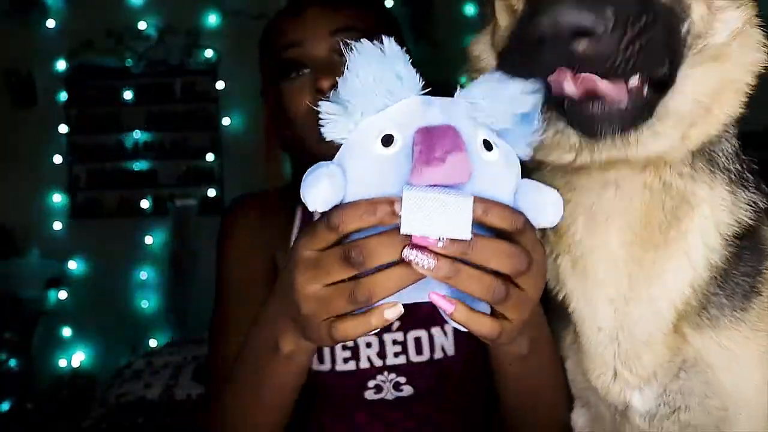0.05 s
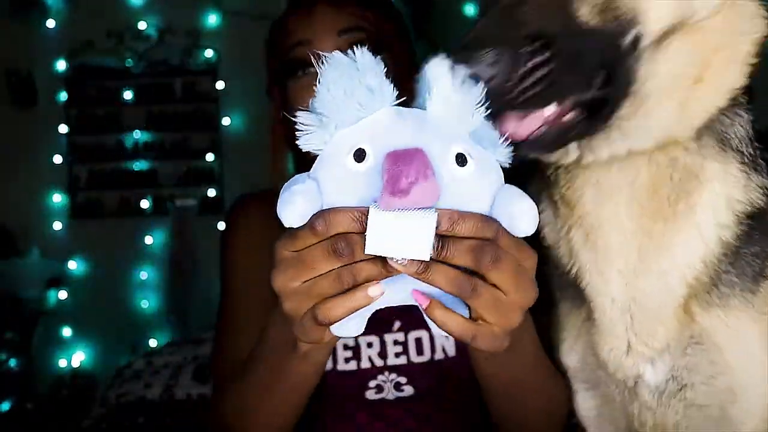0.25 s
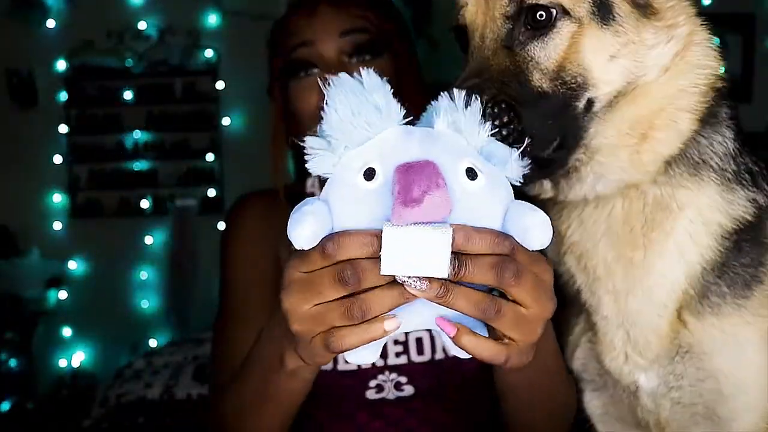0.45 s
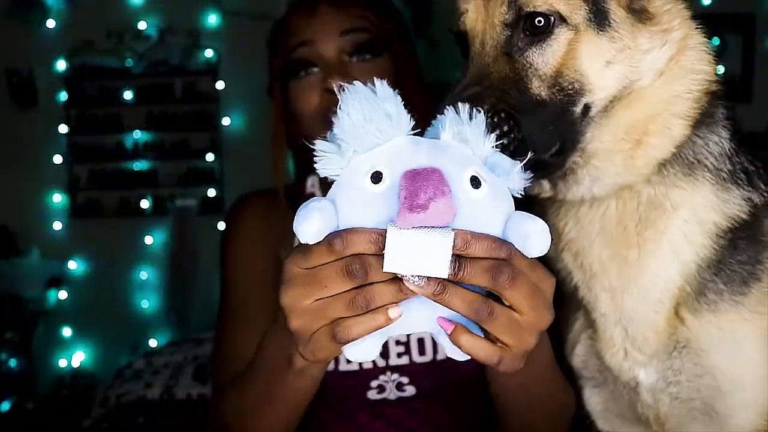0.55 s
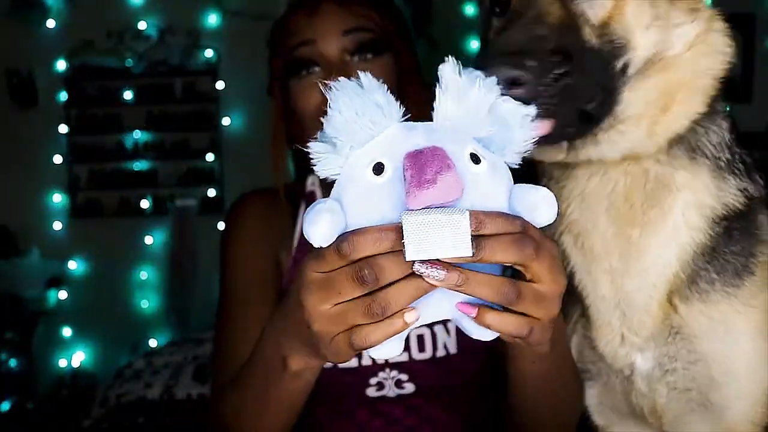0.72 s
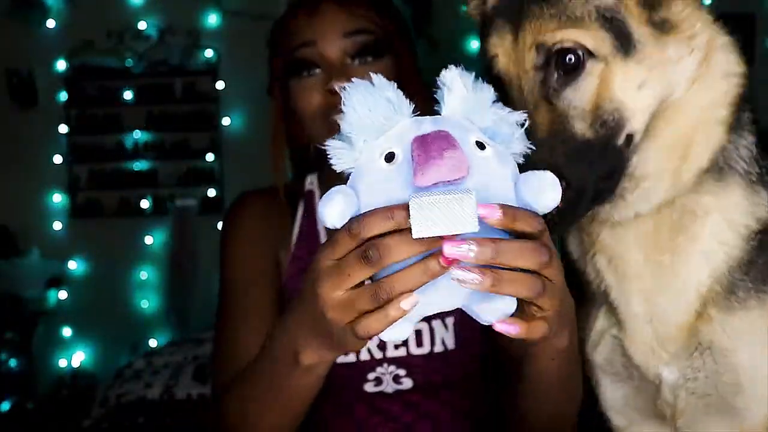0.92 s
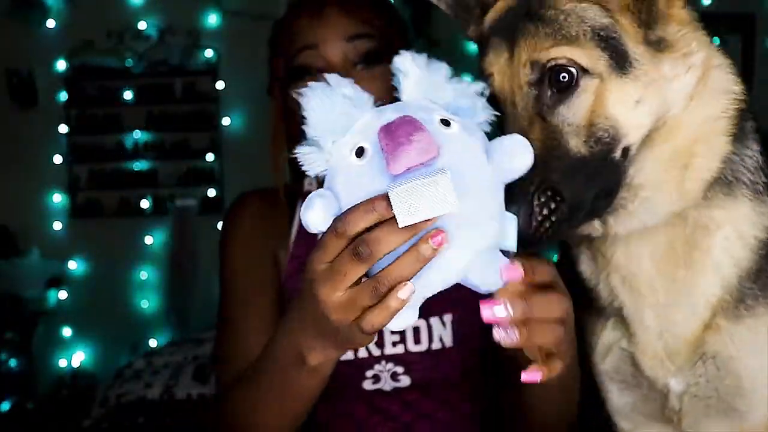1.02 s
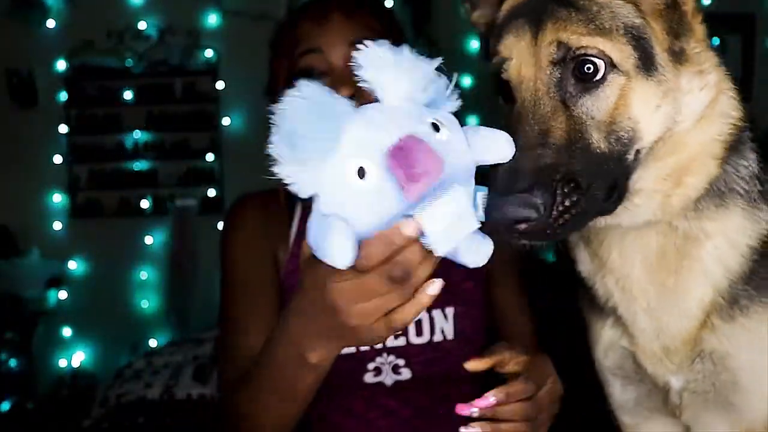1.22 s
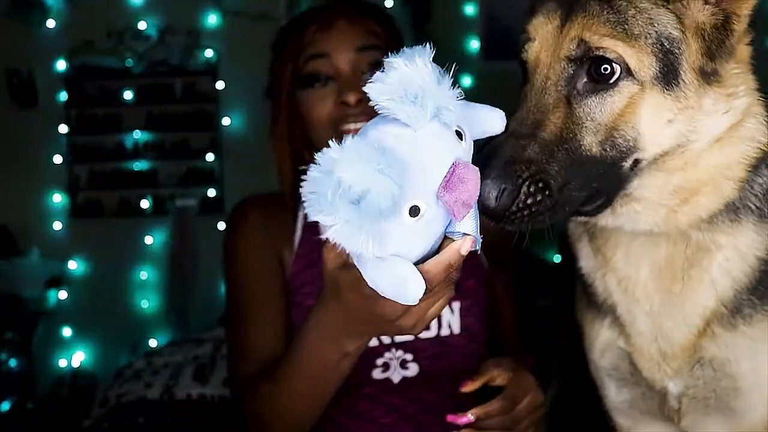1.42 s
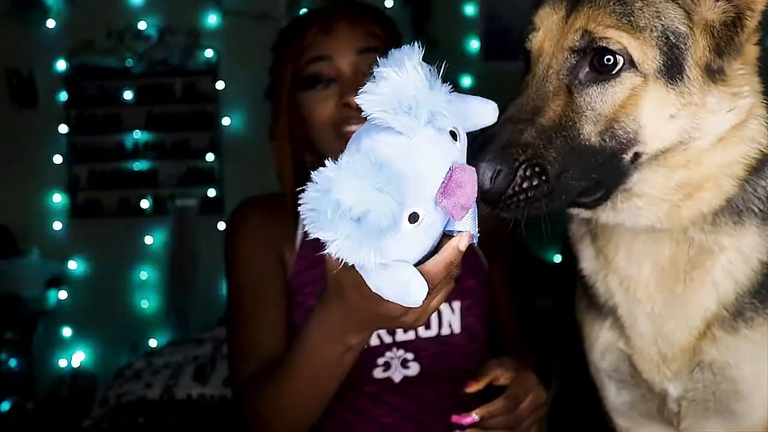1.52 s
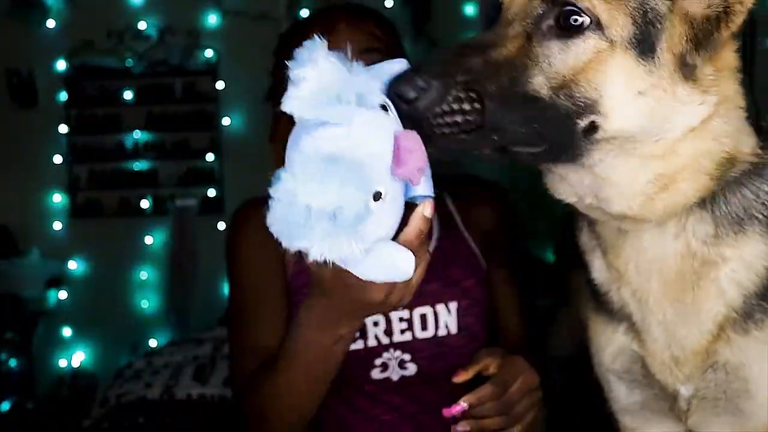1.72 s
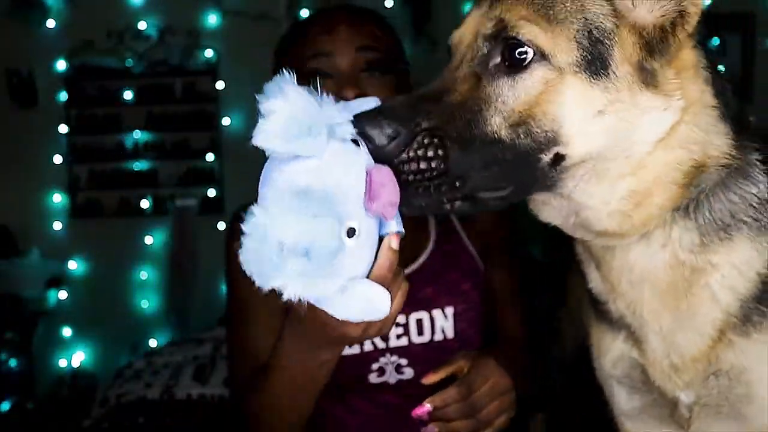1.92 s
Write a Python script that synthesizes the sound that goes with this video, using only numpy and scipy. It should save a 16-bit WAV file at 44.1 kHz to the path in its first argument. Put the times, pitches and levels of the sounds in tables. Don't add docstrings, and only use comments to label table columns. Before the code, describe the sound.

Crinkle film inside a soft toy crackles, then its reed squeaks out and back, twice, the second pair longer; rubbing, light snaps and a soft hollow pop follow, close to the microphone in a furnished room.

```python
import sys
import numpy as np
from scipy import signal
from scipy.fft import rfft, irfft, next_fast_len
from scipy.io import wavfile
from scipy.ndimage import uniform_filter1d, map_coordinates

SR = 44100
rng = np.random.default_rng(int(sys.argv[2]) if len(sys.argv) > 2 else 0)


def dump_mix(stems):
    frames = np.atleast_2d(stems).T
    limited = np.clip(frames, -1, 1)
    pcm = np.round(limited * 32767).astype(np.int16)
    wavfile.write(sys.argv[1], SR, pcm)


def voltage_ratio(decibels):
    exponent = np.asarray(decibels, float) / 20
    return 10 ** exponent


N = 85995

# time in seconds, effort in dB.
EFFORT = [(0, -59.5), (0.15, -49.5), (0.161, -36.5), (.21, -30.5), (0.289, -33), (.33, -40.5), (.78, -41),
          (.86, -39), (.97, -47.5), (1.0, -55.5), (1.06, -46.5), (1.09, -55), (1.16, -52.5), (1.22, -40.5),
          (1.275, -50.5), (1.31, -39.5), (1.37, -56.5), (1.66, -47.5), (1.8, -54.5)]
# time in seconds, fold peak in dB, crease peak in dB, note in Hz.
FIRST_SNAPS = [(0.0194, -33, -32.5, 3040), (0.0397, -26, -29.5, 3000), (0.0527, -31, -38, 3450),
               (0.0571, -25, -19.5, 6530), (0.063, -44, -34, 6460), (0.0754, -29, -30, 2930),
               (0.1026, -44, -31, 6420), (0.1223, -34, -31, 6680), (0.13, -24, -27, 3060),
               (0.1474, -37, -32, 2840), (0.159, -19, -27, 2890), (0.1694, -31, -30, 6270),
               (0.1759, -19, -35, 2930), (0.1825, -22, -24, 2450), (0.1966, -29, -22, 3060),
               (0.2018, -18, -16, 2800), (0.2051, -24, -28, 2670), (0.213, -18, -21, 2950),
               (0.2216, -20, -29, 2970), (0.228, -18, -23, 3010), (0.233, -19, -31, 3360),
               (0.2384, -30, -19.5, 4130), (0.2487, -28, -20, 7450), (0.2538, -27, -30, 2800),
               (0.257, -19, -23, 3100), (0.2613, -30, -29, 2800), (0.27, -10.5, -19, 2710),
               (0.2744, -18, -21, 2670), (0.2902, -30, -15.5, 6720), (0.3683, -33, -35, 6070),
               (0.3774, -20, -35, 4050), (0.3836, -29, -33, 1020), (0.397, -23, -19, 2800),
               (0.5017, -29, -21, 6720), (0.5206, -24, -23.5, 2910), (0.5367, -29, -22, 6850),
               (0.808, -25, -24, 2670), (0.824, -19, -27, 2650), (0.8479, -26, -28, 1640),
               (0.8583, -31.5, -21, 8310), (0.8646, -26, -36, 1250), (0.8785, -28.5, -24, 2800),
               (0.898, -19.5, -24, 2970), (0.9019, -32, -22, 2930), (0.919, -36, -28, 2500),
               (0.9451, -15, -19.5, 2070)]
# time in seconds, fold peak in dB, crease peak in dB, note in Hz.
LAST_SNAPS = [(0.976, -26, -24, 6200), (1.0226, -26, -24, 8500), (1.0398, -29, -21, 7360),
              (1.0623, -25, -22, 6500), (1.111, -22, -32, 2890), (1.1261, -30, -31, 2110),
              (1.1606, -30, -29, 3230), (1.168, -29, -27, 2860), (1.171, -30, -27, 3000),
              (1.18, -27, -36, 2540), (1.2119, -17, -24, 2970), (1.2212, -22, -17, 8200),
              (1.2227, -26, -12, 9100), (1.2366, -34, -23, 6800), (1.244, -29, -32, 3190),
              (1.2832, -30, -26, 2890), (1.2957, -24, -26, 2970), (1.3, -27, -15, 9730),
              (1.3049, -22, -24, 2840), (1.3084, -20, -20, 3920), (1.3212, -21, -16, 7880),
              (1.3258, -17, -11, 7900), (1.4362, -32, -31, 2970), (1.4489, -40, -29, 6550),
              (1.4685, -43, -26, 12200), (1.5182, -31, -30, 3060), (1.5435, -35, -35, 2840),
              (1.5518, -27, -39, 2940), (1.5763, -30, -34, 2930), (1.5932, -33, -34, 3230),
              (1.6023, -36, -32, 3320), (1.64, -27, -25, 2890), (1.6515, -29, -27, 2330),
              (1.666, -31, -31, 2890), (1.7265, -23, -26, 3140), (1.7462, -34, -29, 7240),
              (1.8014, -36, -27, 6540), (1.8474, -31, -33, 2760), (1.8674, -29, -29, 2770),
              (1.9186, -38, -27, 6800), (1.9231, -33, -22, 7100)]
CREASE_CYCLES, GLINT_HZ = 15, 10300


def unit(x):
    return x / np.sqrt(np.mean(x ** 2) + 1e-20)


def along(points, hz):
    f, v = np.transpose(points)
    return np.interp(np.log(hz + 1), np.log(f + 1), v)


def wobble(rate_hz):
    knots = rng.standard_normal(int(N * rate_hz / SR) + 4)
    return map_coordinates(knots, [np.arange(N) * rate_hz / SR])


def filtered(x, response):
    m = next_fast_len(N + 8192)
    return irfft(rfft(x, m) * response(np.fft.rfftfreq(m, 1 / SR)), m)[..., :N]


def causal(points):
    def response(hz):
        cepstrum = irfft(np.maximum(along(points, hz), -70) * np.log(10) / 20)
        half = len(cepstrum) // 2
        cepstrum[1:half] *= 2
        cepstrum[half + 1:] = 0
        return np.exp(rfft(cepstrum))
    return response


def effort_db():
    return np.interp(np.arange(N) / SR, *np.transpose(EFFORT))


def squeaker():
    # time in seconds, reed pitch in Hz, level in dB.
    squeaks = [
        [(.296, 1395, -26), (.304, 1076, -12), (.313, 1075, -16.5), (.321, 1068, -17.5), (.329, 1031, -17.5),
         (.339, 914, -34), (.347, 870, -56)],
        [(.404, 1020, -27), (.4092, 992, -15), (.418, 1007, -18.5), (.425, 999, -18.5), (.431, 966, -22),
         (.443, 870, -26.5), (.456, 837, -38)],
        [(.554, 1450, -20.5), (.5598, 1096, -10), (.569, 1100, -15.5), (.585, 1144, -17), (.605, 1219, -16.5),
         (.628, 1068, -21.5), (.650, 930, -32)],
        [(.688, 1000, -28), (.693, 983, -16.5), (.701, 1002, -18), (.725, 1053, -17), (.748, 1115, -19),
         (.754, 1074, -20.5), (.763, 938, -25), (.786, 820, -40.5)],
    ]
    # frequency in Hz, gain in dB.
    outlets = [
        [(530, -27), (2140, -1), (3200, -9.5), (4300, -8), (5350, -14.5), (7500, -6.5), (9600, -21.5),
         (11800, -39)],
        [(530, -21), (1000, -5), (4050, 0), (5900, -26), (7050, -7), (8050, 0), (10000, -18.5), (12000, -27)],
        [(530, -32), (1130, -7), (2270, -1), (3450, 0), (5000, -14), (7200, -4), (9000, -15.5), (11300, -36)],
        [(530, -21), (1020, -3.5), (2150, 1), (4200, -4), (6200, -26), (8300, -2.5), (10300, -25), (12500, -40)],
    ]
    wakes_db, dulls_db = 4.5, 0.11
    jitter, shimmer_db, uneven_db = 0.0013, -0.5, 1.32
    smear_rad = 0.11
    air_db, edge_s = -24, 0.0028
    hiss_db, hiss_hz = -20, 8130
    out = np.zeros(N)
    t = np.arange(N) / SR
    k = np.arange(1, 14)[:, None]
    for i, rows in enumerate(squeaks):
        s, hz, db = np.transpose(rows)
        level_db = np.interp(t, s, db)
        pitch_hz = np.interp(t, s, hz) * (1 + jitter * wobble(330))
        phase = 2 * np.pi * np.cumsum(pitch_hz) / SR
        starting = t < s[1]
        change_db = level_db - np.where(starting, db[1], db[2])
        tilt_db = np.where(starting, wakes_db, dulls_db) * change_db * (k - 1)
        waves = np.cos(k * phase + smear_rad * k ** 2)
        drift_db = uneven_db * np.array([wobble(90.14) for _ in k])
        pulses = (voltage_ratio(np.minimum(tilt_db, 1) + drift_db) * waves).sum(0)
        pulses = pulses * voltage_ratio(shimmer_db * wobble(150))
        air = voltage_ratio(air_db) * rng.standard_normal(N) * (1 + np.cos(phase))
        gate = np.clip(np.minimum(t - s[0], s[-1] - t) / edge_s, 0, 1)
        colour = causal(outlets[i])
        scale = np.std(filtered(waves.sum(0), colour)[gate > 0.5])
        sign = (-1) ** (i + 1)
        out += sign * filtered((pulses + air) * gate * voltage_ratio(level_db), colour) / scale

        leak = unit(filtered(rng.standard_normal(N),
                             lambda f: np.exp(-(np.log((f + 1) / hiss_hz) / 0.21) ** 2)))
        leak_db = hiss_db + db.max() + 0.47 * (level_db - db.max())
        opening = np.clip((t - s[1]) / (s[-3] - s[1]), 0, 1)
        out += leak * gate * voltage_ratio(leak_db) * opening
    return out


def snaps(s, db, hz, cycles):
    lag_s, puff_t60_s, tone_share, spike_size = -0.0001, 0.0059, 0.67, 0.58
    t = np.arange(300) / SR
    draw = rng.standard_normal((len(s), len(t)))
    ring = np.sin(2 * np.pi * hz[:, None] * t) * voltage_ratio(-60 * t * hz[:, None] / cycles)
    spike = spike_size * np.sign(draw[:, :1]) * ((t == 0) - 1. * (t == t[2]))
    puff = draw * voltage_ratio(-60 * t / puff_t60_s)
    grain = spike + tone_share * ring + (1 - tone_share) * puff
    grain = grain * (voltage_ratio(db) / abs(grain).max(1))[:, None]
    where = np.round((s + lag_s) * SR).astype(int)[:, None] + np.arange(len(t))
    return np.bincount(np.maximum(where, 0).ravel(), grain.ravel(), N + SR)[:N]


def folds():
    # frequency in Hz, gain in dB.
    fold_colour = [(250, -20), (900, -3), (3500, 2.5), (6500, -17.5)]
    # frequency in Hz, gain in dB.
    crease_colour = [(2500, -22), (5500, 1.5), (12000, 1), (16000, -11.5)]
    usual_fold_hz, usual_crease_hz, split_hz = 2800, 7000, 4500
    s, fold_db, crease_db, hz = np.vstack([FIRST_SNAPS, LAST_SNAPS]).T
    low = hz < split_hz
    fold = snaps(s, fold_db + 3, np.where(low, hz, usual_fold_hz), cycles=8)
    crease = snaps(s, crease_db + 2, np.where(low, usual_crease_hz, hz), CREASE_CYCLES)
    return filtered(fold, causal(fold_colour)) + filtered(crease, causal(crease_colour))


def film():
    # frequency in Hz, density in dB per Hz.
    film_colour = [(250, -21), (600, -6), (1500, -4.5), (2900, -4.5), (4600, -7.5), (7800, -4),
                   (11000, -11), (16000, -20)]
    crackle_per_s, spread_db, clump_db = 2500, 4.5, 2.5
    fold_hz, crease_hz, fold_share, pitch_scatter = 2970, 7440, 0.55, 0.26
    crackle_db, rustle_db = -0.26, -5
    u = rng.random((round(crackle_per_s * N / SR), 2))
    hz = np.where(rng.random(len(u)) < fold_share, fold_hz, crease_hz)
    hz = np.clip(hz * np.exp(pitch_scatter * rng.standard_normal(len(u))), 800, 15000)
    small = snaps(u[:, 0] * N / SR, -spread_db * np.log(u[:, 1] + 0.01), hz, cycles=13.5)
    crackle = unit(filtered(small * voltage_ratio(clump_db * wobble(70)), causal(film_colour)))
    rustle = rng.standard_normal(N) * voltage_ratio(2.5 * wobble(90))
    rustle = unit(filtered(rustle, causal(film_colour)))
    return voltage_ratio(effort_db()) * (voltage_ratio(crackle_db) * crackle + voltage_ratio(rustle_db) * rustle) + folds()


def glints():
    glint_db, fizz_db = -7, -9
    s, _, crease_db, _ = np.vstack([FIRST_SNAPS, LAST_SNAPS]).T
    draw = rng.standard_normal((2, 2, len(s)))
    pair = np.array([snaps(s, crease_db + glint_db + 2 * a, GLINT_HZ * np.exp(b / 8), CREASE_CYCLES)
                     for a, b in draw])
    fizz = voltage_ratio(fizz_db + effort_db()) * rng.standard_normal((2, N))
    return filtered(pair + fizz, lambda hz: hz ** 4 / (hz ** 4 + GLINT_HZ ** 4))


def bulb():
    # start in seconds, length in seconds, level in dB.
    drags = [
        (0.948, 0.043, -37.5),
        (1.2, 0.055, -38),
        (1.293, 0.067, -42.5),
    ]
    # frequency in Hz, density in dB per Hz.
    drag_colour = [(59, -30), (380, -1), (1780, -0.5), (4560, -9), (7800, -65)]
    pop_s, pop_hz, pop_db, pop_rise_s, pop_t60_s = 0.953, 374, -37, 0.0079, 0.24
    t = np.arange(N) / SR
    stroke = np.zeros(N)
    for s, length_s, db in drags:
        fade = np.clip(1 - (t - s) / length_s, 0, 1) ** 0.6
        stroke += voltage_ratio(db) * np.clip((t - s) / 0.0029, 0, 1) * fade
    drag = unit(filtered(rng.standard_normal(N) * voltage_ratio(2.4 * wobble(200)), causal(drag_colour)))
    u = np.maximum(t - pop_s, 0)
    pop = voltage_ratio(pop_db - 60 * u / pop_t60_s + 0.89 * wobble(39.0)) * (1 - np.exp(-u / pop_rise_s))
    return stroke * drag + pop * np.sin(2 * np.pi * pop_hz * u)


def thumps():
    # time in seconds, frequency in Hz, level in dB.
    shoves = [
        (.352, 210, -41),
        (1.221, 190, -34),
    ]
    t60_s = 0.019
    out = np.zeros(N)
    for s, hz, db in shoves:
        u = np.maximum(np.arange(N) / SR - s, 0)
        out += voltage_ratio(db - 60 * u / t60_s) * np.sin(2 * np.pi * hz * u)
    return out


def scatter(x):
    # frequency in Hz, gain in dB.
    body_colour = [(2000, -21.5), (6000, -9.5), (13000, -5.5)]
    t60_s = 0.025
    t = np.arange(500) / SR
    burst = rng.standard_normal((2, len(t))) * voltage_ratio(-60 * t / t60_s)
    burst /= np.linalg.norm(burst, axis=1, keepdims=True)
    echoes = signal.fftconvolve(x[None], burst, axes=1)[:, :N]
    return filtered(echoes, lambda hz: voltage_ratio(along(body_colour, hz)))


def corners(x):
    # frequency in Hz, width in Hz, level in dB.
    modes = [(996, 7.3, -3), (1068, 6.8, -7)]

    def response(f):
        return sum(voltage_ratio(db) * 1j * f * w / (c * c - f * f + 1j * f * w) for c, w, db in modes)
    return filtered(x, response)


def room(x):
    # frequency in Hz, t60 in seconds.
    decay = [(300, 0.4), (1000, 0.53), (3000, 0.22), (12000, 0.39)]
    tail_db, early_db = -12.5, -17
    hz, t, z = signal.stft(rng.standard_normal((2, SR // 2)), SR, nperseg=256)
    fade = voltage_ratio(-60 * t / along(decay, hz)[:, None])
    tail = signal.istft(z * fade, SR, nperseg=256)[1]
    tail *= voltage_ratio(tail_db) / np.linalg.norm(tail[0])
    for ear in tail:
        ear[rng.integers(10, 500, size=7)] += voltage_ratio(early_db) * rng.normal(0, 0.86, size=7)
    return signal.fftconvolve(np.pad(x, (60, 0))[None], tail, axes=1)[:, :N]


def hush():
    # frequency in Hz, density in dB.
    hush_colour = [(12, -43), (25, -6), (351, -7), (2400, -15), (3940, -16.5), (13600, -28.5), (16500, -40)]
    # frequency in Hz, correlation from 0 to 1.
    likeness = [(60, 0.76), (500, 0.47), (15000, 0.08)]
    level_db = -50

    def mid_side(hz):
        angle = np.arccos(np.clip(along(likeness, hz), -1, 1)) / 2
        return voltage_ratio(along(hush_colour, hz)) * [np.cos(angle), np.sin(angle)]
    mid, side = filtered(rng.standard_normal((2, N)), mid_side)
    return voltage_ratio(level_db + wobble(5.74)) * unit(np.array([mid + side, mid - side]))


def scene():
    # frequency in Hz, left minus right in dB.
    balance = [(100, 2), (700, -3), (2500, -5), (8000, -5), (15000, -6)]
    duck_from_db, duck_ratio, duck_s = -34, 0.35, 0.038
    hush_ducks = 1.7
    lag_s = 0.000022
    reed = squeaker()
    loud_db = 10 * np.log10(abs(uniform_filter1d(reed ** 2, SR // 200)) + 1e-12)
    keep = np.exp(-1 / (duck_s * SR))
    cut_db = -duck_ratio * np.maximum(loud_db - duck_from_db, 0)
    duck = voltage_ratio(signal.lfilter([1 - keep], [1, -keep], cut_db))
    toy = reed + duck * (film() + bulb() + thumps())
    side = np.array([[1], [-1]])

    def placed(hz):
        return voltage_ratio(side * along(balance, hz) / 2) * np.exp(-1j * np.pi * side * hz * lag_s)
    near = toy + room(toy) + scatter(toy) + corners(reed) + duck * glints()
    return filtered(near, placed) + duck ** hush_ducks * hush()


def roll_off(x):
    return signal.sosfilt(signal.butter(12, 16990, fs=SR, output="sos"), x)


def record(dry):
    top_hz, ceiling = 16500, 0.98
    dry = filtered(dry, lambda hz: hz < top_hz)
    mix = dry / (1 + abs(dry / ceiling) ** 10) ** (1 / 10)
    return roll_off(mix)


dry = scene()
out = record(dry)
dump_mix(out)
```